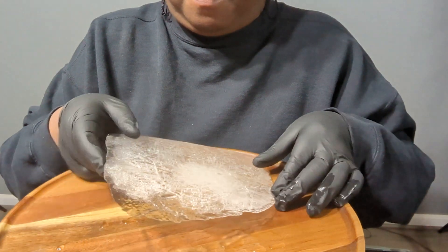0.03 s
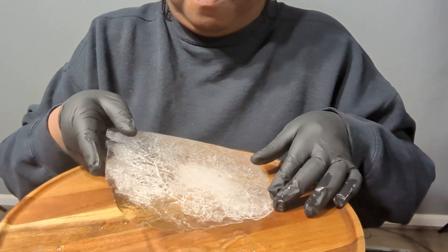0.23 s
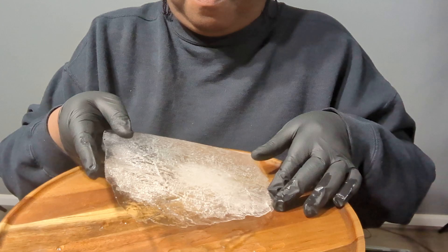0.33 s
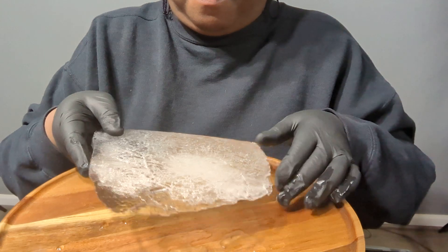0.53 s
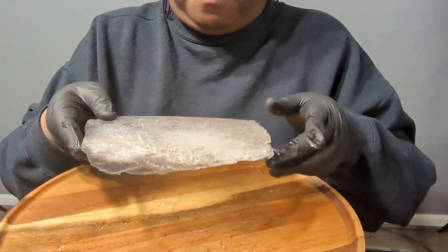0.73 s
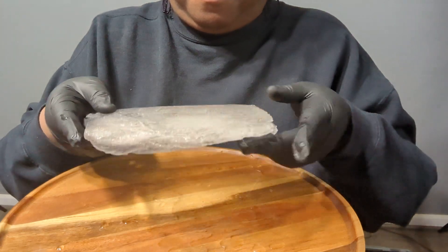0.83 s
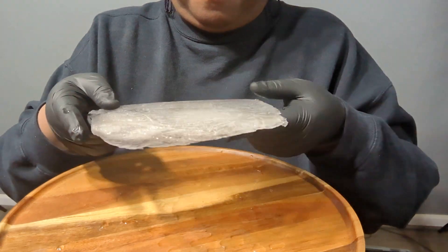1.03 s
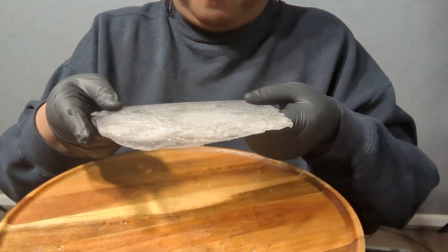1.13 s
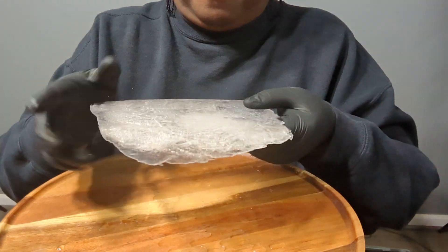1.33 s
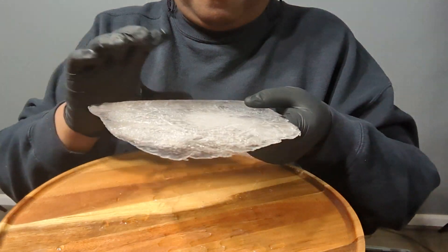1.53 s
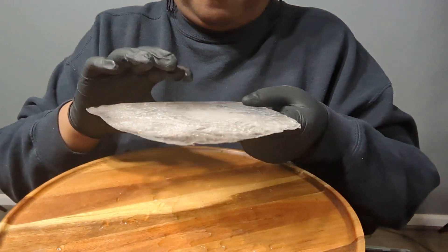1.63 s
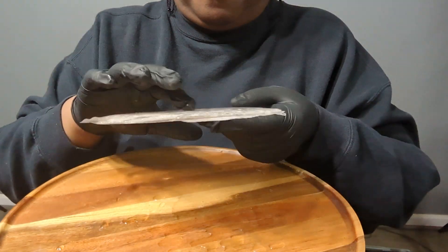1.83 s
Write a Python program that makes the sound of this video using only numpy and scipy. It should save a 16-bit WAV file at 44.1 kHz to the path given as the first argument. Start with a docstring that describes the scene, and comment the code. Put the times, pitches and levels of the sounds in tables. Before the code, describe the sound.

One sharp, booming knock of ice on wood, then faint ticks and glove rustles.

```python
"""A small, quiet room with a faint hum. A thin slab of ice, tilted in gloved hands, scrapes on a round
wooden board, then knocks on it in a quick cluster of contacts. The ice cracks and rings briefly;
the board and its table boom. As the slab is lifted, its edge ticks and the gloves rustle on it.
The close microphone just overloads on the knock."""
import sys
import numpy as np
from scipy import signal
from scipy.fft import rfft, irfft, next_fast_len
from scipy.io import wavfile

SR = 44100
rng = np.random.default_rng(int(sys.argv[2]) if len(sys.argv) > 2 else 0)


def log_audio(samples):
    """Write samples as a 16-bit WAV file to the path given in sys.argv[1]."""
    # one column per channel
    frames = np.atleast_2d(samples).T
    # limit to full scale, then quantise
    limited = np.clip(frames, -1, 1)
    pcm = np.round(limited * 32767).astype(np.int16)
    wavfile.write(sys.argv[1], SR, pcm)


N = 83790

# room air: freq_hz, gain_db
AIR_SPECTRUM = [(20, -8.5), (36, -2), (60, -5.5), (100, 2), (150, -5.5), (185, -9.5), (215, -10),
                (330, -23), (600, -27.5), (1200, -32), (2400, -35.5), (3200, -42.5), (5000, -43.5),
                (9000, -46), (16000, -53)]
# mains hum: pitch_hz, level_db
HUM_PARTIALS = [(120, -61.5), (360, -73), (480, -75)]
# ice edge sliding on wood: centre_s, sigma_s, level_db
SCRAPE_STROKES = [(.005, 0.0037, -48), (.040, 0.02, -43), (.125, 0.048, -55), (.195, .009, -50),
                  (.392, 0.0089, -51.5)]
# scraping: freq_hz, gain_db
SCRAPE_SPECTRUM = [(200, -8), (860, -7), (925, 17), (985, -4.5), (1130, 9), (1250, 1.5), (1480, 1),
                   (1615, 14.5), (1760, 2), (2000, -2), (4000, -1), (6000, -4.5), (9000, -2.5),
                   (16000, -13)]
# nudges of the table: centre_s, sigma_s, level_db
TABLE_NUDGES = [(.08, 0.096, -35), (.85, 0.15, -50.5)]
# table rumble: freq_hz, gain_db
RUMBLE_SPECTRUM = [(20, -6.5), (36, 2.5), (48, -9.5), (67, -1), (120, -15.5), (175, -19), (235, -12),
                   (400, -36.5), (1000, -60)]
# slab's weight landing on the board: start_s, level_db
BOARD_THUMPS = [(.056, -23), (.182, -25), (.211, 0.5)]
# board on its table: pitch_hz, level_db, t60_s, rise_s
BOARD_MODES = [(35.8, -23, 1.45, .04), (66.6, -4.5, .32, .02), (106, -17, .36, .003), (177, -17, .27, .012),
               (213, -11, .25, .02), (219, -32, 1.6, .01), (243, -9, .22, .02), (262, -6, .26, .006),
               (271, -17, .46, .04), (312, -18, .18, .003)]
# ice meeting wood: start_s, crack_db, ring_db
ICE_CONTACTS = [(0.107, -39.5, -41), (0.197, -27, -36.5), (.2008, -18, -33.5), (0.2064, -7, -21),
                (0.2082, -12.5, -12), (.2102, -12.5, -19.5), (.2149, -14, -30), (.2170, -3.5, -15),
                (0.2431, -21, -40.5)]
# contact crack: freq_hz, gain_db
CRACK_SPECTRUM = [(150, -16), (400, -13), (530, -1), (1000, -4.5), (2000, 1), (4000, -2), (7000, -0.5),
                  (10000, -1), (13000, -4.5), (16000, -14.5)]
# ringing slab: pitch_hz, level_db, t60_s
ICE_MODES = [(520, -23, .025), (727, -12.5, .17), (930, -26, .04), (1163, -20, .07), (1648, 1.5, .045),
             (1750, -2, .04), (1970, -6, .028), (2075, -9, .03), (2465, -9, .03), (2680, -10, .03),
             (3488, -5, .028), (3680, -8, .025), (4378, -8, .024), (5280, -11, .022)]
# ice edge and wet gloves ticking: start_s, level_db, t60_s, tilt_db_per_octave
EDGE_TICKS = [(0.107, -29.5, 0.0047, -2.5), (0.2429, -12.5, 0.0038, -1), (0.3168, -40, 0.037, -4.5),
              (0.3524, -42, 0.01, -5), (.3712, -27, 0.0049, -3), (0.377, -32.5, 0.0076, -1),
              (0.3814, -18.5, .002, 1), (.3942, -20.5, 0.0022, 3), (0.4037, -29.5, 0.0052, -3),
              (0.4535, -42, 0.013, -1.5), (0.5031, -44, .005, 1), (0.7978, -50, 0.0066, -6),
              (.8046, -44.5, 0.0048, -7), (0.854, -46, .008, -8), (1.0295, -47, 0.0056, 1),
              (1.0968, -54, 0.017, -4.5), (1.1008, -54, 0.0097, -6), (1.1150, -43, 0.016, 2.5),
              (1.2288, -52.5, 0.014, -6), (1.297, -50, 0.0064, 3), (1.3436, -59, 0.0055, 2),
              (1.372, -44.5, 0.0046, -3), (1.4485, -44, 0.0046, -6)]
# ticks and grip crackle: freq_hz, gain_db
TICK_SPECTRUM = [(300, -18.5), (1000, -16), (1700, -2), (2400, -5.5), (3500, 1), (5500, 1.5), (9000, 1),
                 (16000, -13)]
# gloves and sleeves rubbing: centre_s, sigma_s, level_db, tilt_db_per_octave
RUB_STROKES = [(0.39, 0.035, -55.5, 2.5), (.55, .01, -62, -2), (0.602, 0.019, -60.5, 0),
               (0.667, 0.014, -59, 1), (0.673, 0.0035, -51, -1), (.686, 0.0022, -55, -4),
               (0.711, 0.0096, -56, -2), (0.854, 0.094, -63, -2), (1.445, 0.026, -59, 4.5),
               (1.533, 0.074, -70.5, 3)]
# rubbing: freq_hz, gain_db
RUB_SPECTRUM = [(300, -16.5), (1800, -8.5), (2400, -7.5), (3400, -1.5), (4300, -4), (6000, -2),
                (10000, -10), (16000, -19)]
# gloves gripping the ice: centre_s, sigma_s, level_db
GRIPS = [(.56, 0.066, -65.5), (1.14, 0.047, -69), (1.31, 0.075, -71.5)]
# room tail: freq_hz, t60_s
ROOM_DECAY = [(200, 0.58), (1600, 0.39), (5000, 0.25), (14000, 0.27)]

CRACK_T60_S, CONTACT_RISE_S = 0.007, 0.0001
SLIPS_PER_S, SLIP_SPREAD_DB = 4600, 3.5
TAIL_DB, WALLS_DB, WALLS_T60_S, ROOM_RISE_S = -18.5, -19.5, 0.08, 0.008
AIR_DB, BOARD_SEND_DB = -48, -1
OVERLOAD_PEAK, TOP_HZ = 1.05, 15900


def amp(db):
    """Decibels to gain."""
    return 10 ** (np.asarray(db) / 20)


def unit_rms(x):
    """Scale to rms 1."""
    return x / np.sqrt(np.mean(x ** 2) + 1e-20)


def curve_at(points, hz):
    """Interpolate (freq_hz, value) points on a log axis."""
    freqs_hz, values = np.transpose(points)
    return np.interp(np.log(hz + 1), np.log(freqs_hz + 1), values)


def since(start_s):
    """Seconds since start_s, zero before."""
    return np.maximum(np.arange(N) / SR - start_s, 0)


def strike(start_s, t60_s, rise_s):
    """Envelope with exponential rise and decay."""
    envelope, start = np.zeros(N), round(start_s * SR)
    t = np.arange(min(N - start, int(2 * t60_s * SR))) / SR
    envelope[start:start + len(t)] = amp(-60 * t / t60_s) * (1 - np.exp(-t / rise_s))
    return envelope


def swell(centre_s, sigma_s, level_db):
    """Gaussian envelope of one stroke."""
    return amp(level_db) * np.exp(-0.5 * ((np.arange(N) / SR - centre_s) / sigma_s) ** 2)


def swells(strokes):
    """Summed stroke envelopes."""
    return sum(swell(*stroke) for stroke in strokes)


def coloured(x, spectrum, tilt_db_per_octave=0, taps=1024):
    """Minimum-phase filter, unit power gain."""
    hz = np.fft.rfftfreq(taps, 1 / SR)
    octaves = np.log2(np.maximum(hz, spectrum[0][0]))
    gain = unit_rms(amp(curve_at(spectrum, hz) + tilt_db_per_octave * octaves))
    cepstrum = irfft(np.log(np.maximum(gain, 1e-6)))
    cepstrum[1:taps // 2] *= 2
    cepstrum[taps // 2 + 1:] = 0
    return signal.oaconvolve(x, irfft(np.exp(rfft(cepstrum))))[:N]


def slips(per_s):
    """Friction: tiny slips of uneven size at random times, rms 1."""
    sizes = amp(SLIP_SPREAD_DB * rng.uniform(-1, 1, N))
    slipping = rng.random(N) < per_s / SR
    return unit_rms(slipping * rng.standard_normal(N) * sizes)


def chatter():
    """Equal pushes of random sign inside a contact."""
    return np.sign(rng.standard_normal(N))


def room_tone():
    """Steady dark air and faint mains hum."""
    hum = sum(np.sqrt(2) * amp(db) * np.sin(2 * np.pi * (hz * since(0) + rng.random()))
              for hz, db in HUM_PARTIALS)
    air = unit_rms(coloured(rng.standard_normal(N), AIR_SPECTRUM, taps=8192))
    return amp(AIR_DB) * air + hum


def ice_scrape():
    """The ice edge slips over wood."""
    return coloured(slips(SLIPS_PER_S) * swells(SCRAPE_STROKES), SCRAPE_SPECTRUM, taps=4096)


def table_rumble():
    """The nudged table gives swells of low noise."""
    rumble = unit_rms(coloured(rng.standard_normal(N), RUMBLE_SPECTRUM, taps=8192))
    return rumble * swells(TABLE_NUDGES)


def board_boom():
    """The slab's weight drives the board's low modes, neighbours in opposite sign."""
    boom = np.zeros(N)
    for start_s, thump_db in BOARD_THUMPS:
        for k, (hz, mode_db, t60_s, rise_s) in enumerate(BOARD_MODES):
            envelope = amp(thump_db + mode_db) * strike(start_s, t60_s, rise_s)
            boom += (-1) ** k * envelope * np.sin(2 * np.pi * hz * since(start_s))
    return boom


def ice_knock():
    """Each contact gives a short crack and rings the slab."""
    envelope = sum(amp(crack_db) * strike(start_s, CRACK_T60_S, CONTACT_RISE_S)
                   for start_s, crack_db, _ in ICE_CONTACTS)
    knock = coloured(envelope * chatter(), CRACK_SPECTRUM)
    t = np.arange(SR // 4) / SR
    modes = np.array([amp(db - 60 * t / t60_s) * np.sin(2 * np.pi * hz * t)
                      for hz, db, t60_s in ICE_MODES])
    for start_s, _, ring_db in ICE_CONTACTS:
        mode_gains = amp(ring_db + rng.standard_normal(len(ICE_MODES)))
        knock[round(start_s * SR):][:len(t)] += mode_gains @ modes
    return knock


def edge_ticks():
    """Short, bright ticks of the ice edge and gloves; some are duller."""
    pushes, ticks = chatter(), np.zeros(N)
    for start_s, db, t60_s, tilt in EDGE_TICKS:
        burst = amp(db) * strike(start_s, t60_s, CONTACT_RISE_S) * pushes
        ticks += coloured(burst, TICK_SPECTRUM, tilt)
    return ticks


def glove_rub():
    """Gloves and sleeves rustle in strokes of dense slips."""
    friction = slips(SLIPS_PER_S)
    return sum(coloured(friction * swell(centre_s, sigma_s, db), RUB_SPECTRUM, tilt)
               for centre_s, sigma_s, db, tilt in RUB_STROKES)


def grip_crackle():
    """The grip on the ice crackles in sparse slips."""
    return coloured(slips(per_s=400) * swells(GRIPS), TICK_SPECTRUM, tilt_db_per_octave=-3)


def reverb(x):
    """Early wall reflections and a tail that dies faster in the treble."""
    hz, t, noise_bins = signal.stft(rng.standard_normal(N), SR, nperseg=256)
    decay = amp(-60 * t / curve_at(ROOM_DECAY, hz)[:, None])
    tail = signal.istft(noise_bins * decay, SR, nperseg=256)[1][:N]
    tail *= 1 - np.exp(-since(0) / ROOM_RISE_S)
    walls = rng.standard_normal(N) * strike(0, WALLS_T60_S, ROOM_RISE_S)
    response = amp(TAIL_DB) * tail / np.linalg.norm(tail) + amp(WALLS_DB) * walls / np.linalg.norm(walls)
    return signal.fftconvolve(x, response)[:N]


def scene():
    """Slab, board and hands in the room, mono."""
    near = ice_knock() + edge_ticks() + ice_scrape() + glove_rub() + grip_crackle() + table_rumble()
    boom = board_boom()
    reflections = reverb(near + amp(BOARD_SEND_DB) * boom)
    return (near + boom + reflections + room_tone())[None]


def record(dry):
    """Microphone: soft clip, then a steep low-pass."""
    clipped = dry / (1 + np.abs(dry / OVERLOAD_PEAK) ** 6) ** (1 / 6)
    fft_size = 2 * next_fast_len(N)
    hz = np.fft.rfftfreq(fft_size, 1 / SR)
    lowpass = 1 / (1 + (hz / TOP_HZ) ** 120)
    return irfft(rfft(clipped, fft_size) * lowpass, fft_size)[..., :N]


dry = scene()
out = record(dry)
log_audio(out)
```